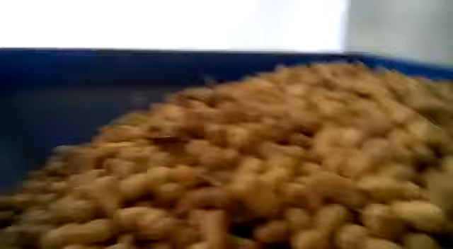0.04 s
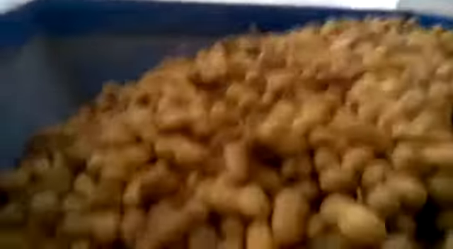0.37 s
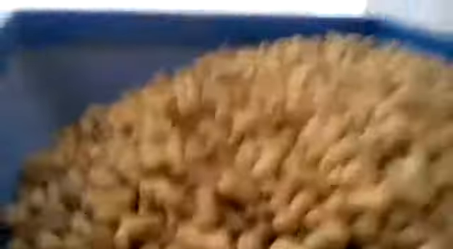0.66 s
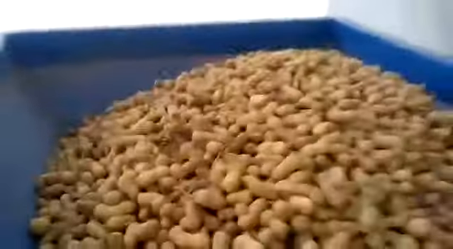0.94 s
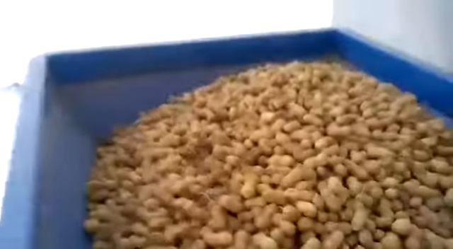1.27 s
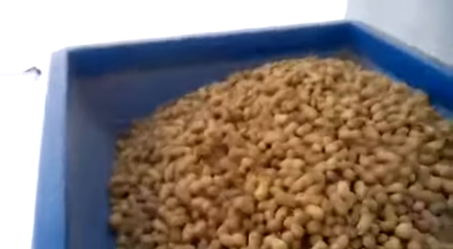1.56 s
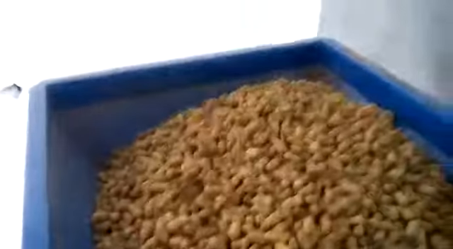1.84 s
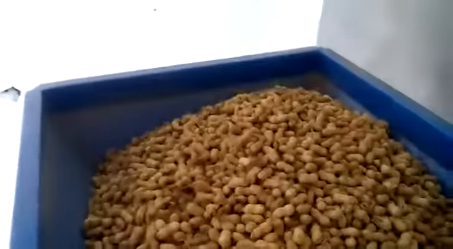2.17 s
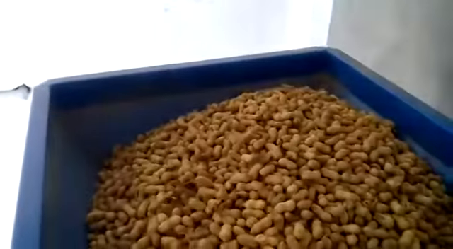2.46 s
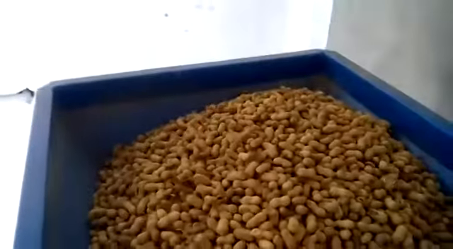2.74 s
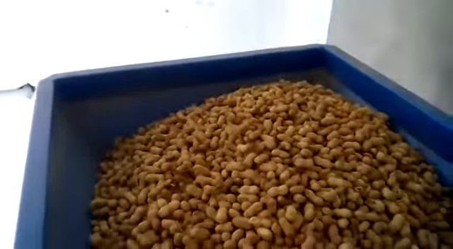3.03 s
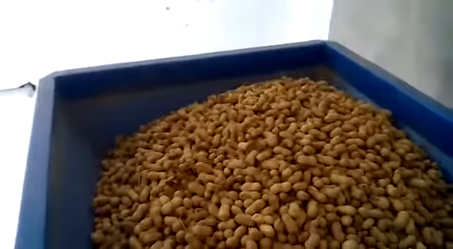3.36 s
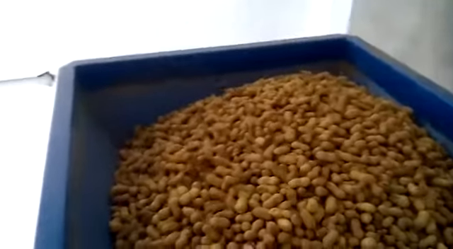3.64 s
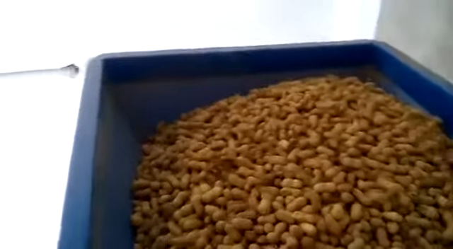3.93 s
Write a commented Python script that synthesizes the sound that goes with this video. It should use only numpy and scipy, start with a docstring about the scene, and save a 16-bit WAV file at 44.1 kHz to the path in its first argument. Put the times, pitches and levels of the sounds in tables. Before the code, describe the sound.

A peanut sheller runs steadily, dry pods rattling and cracking over a low rumble.

```python
"""Peanut sheller in a workshop

A sheller runs under a full hopper in a small, hard-walled room. Dry pods rattle in the drum and surge
over a ringing steel sieve about four times a second; now and then one cracks sharply. Underneath, the
drive hums, pods make the sheet-metal casing rumble and a few dull thuds rise. It all fades in quickly."""
import sys
import numpy as np
from scipy import signal
from scipy.fft import rfft, irfft
from scipy.io import wavfile
from scipy.ndimage import uniform_filter1d

SR = 44100
rng = np.random.default_rng(int(sys.argv[2]) if len(sys.argv) > 2 else 0)


def log_audio(samples):
    """Write samples as a 16-bit WAV file to the path given in sys.argv[1]."""
    # one column per channel
    frames = np.atleast_2d(samples).T
    # limit to full scale, then quantise
    limited = np.clip(frames, -1, 1)
    pcm = np.round(limited * 32767).astype(np.int16)
    wavfile.write(sys.argv[1], SR, pcm)


N = 176400

# rumble and drone as the load on the drum changes: t/s, casing level/dB, panel level/dB
DRUM_LOAD = [(.15, -14, 4.5), (.42, -0.5, 1.5), (0.602, -5, 4.5), (.7, -3.5, 7.5), (.88, 0.5, 3),
             (1.4, -2, 4), (1.75, -2, 2.5), (2.15, -1.5, 0), (2.45, -3, -4), (2.75, -3.5, 1),
             (3.22, -5, 0.5), (3.42, 2.5, 0.5), (3.66, -2, 0), (4, 1, -3)]

HUM_DB, PANEL_DB, CASING_DB, TUMBLE_DB = -46, -39.5, -37.5, -32
WALL_DB, CLINK_DB, TICK_DB, CRACK_DB = -44.5, -38.5, -47.5, -24.5
PING_DB, RATTLE_DB, SURGE_DB, RING_DB = -28.5, -22.5, -22, -21.5
KNOCKS_PER_S, TUMBLE_PER_S, RATTLE_PER_S = 300, 1400, 3500


def undb(db):
    """Decibels to gain."""
    return 10 ** (np.asarray(db) / 20)


def unit(x):
    """Scale to rms 1."""
    return x / np.sqrt(np.mean(x ** 2))


def drift(rate_hz):
    """Smooth random drift with a spread near 1."""
    hold = int(SR / rate_hz)
    steps = np.repeat(rng.standard_normal(N // hold + 1), hold)
    return 1.7 * uniform_filter1d(uniform_filter1d(steps, hold), hold)[:N]


def impacts(per_s, spread_db):
    """Randomly timed blows of uneven size, rms 1."""
    hit = rng.random(N) < per_s / SR
    size = undb(spread_db * np.clip(rng.standard_normal(N), -2, 2))
    return unit(hit * size * np.sign(rng.standard_normal(N)))


def colour(x, points):
    """Give each blow a causal ring with the spectrum of (f/Hz, level/dB) points, rms 1."""
    hz, db = np.array(points).T
    size = 8192
    f = np.maximum(np.arange(size // 2 + 1) * SR / size, 1)
    cepstrum = irfft(np.log(undb(np.interp(np.log(f), np.log(hz), db))))
    cepstrum[1:size // 2] *= 2  # fold to minimum phase
    cepstrum[size // 2 + 1:] = 0
    return unit(signal.fftconvolve(x, irfft(np.exp(rfft(cepstrum))))[:N])


def ring(x, hz, width_hz):
    """One resonance, rms 1: two band-passes in series, each twice width_hz wide."""
    b, a = signal.iirpeak(hz, hz / (2 * width_hz), fs=SR)
    return unit(signal.lfilter(b, a, signal.lfilter(b, a, x)))


def room(x, t60_s=0.31, wet_db=0.5):
    """Direct sound plus the short tail of the workshop."""
    t = np.arange(SR // 2) / SR
    tail = rng.standard_normal(len(t)) * np.exp(-np.log(1000) * t / t60_s) * (t > .004)
    wet = signal.fftconvolve(x, tail / np.sqrt(np.sum(tail ** 2)))[:N]
    return (x + undb(wet_db) * wet) / np.sqrt(1 + undb(2 * wet_db))


def scattered(per_s, spread_db, places=6):
    """Blows from several places, each with its own reflections."""
    return unit(sum(room(impacts(per_s / places, spread_db)) for _ in range(places)))


def pings(per_s, centre_hz, pitch_spread, decay_s):
    """Single pods strike steel parts, each ringing briefly at its own pitch."""
    out, age = np.zeros(N + SR), np.arange(SR // 8) / SR
    for when, pitch, size in rng.random((int(per_s * N / SR), 3)):
        hz = centre_hz * 2 ** (pitch_spread * np.arcsin(2 * pitch - 1))
        strength = np.sqrt(-np.log(1 - size))
        start = int(when * N)
        out[start:start + len(age)] += strength * np.sin(2 * np.pi * hz * age) * np.exp(-age / decay_s)
    return unit(out[:N])


def drive_hum(panels_db, hz=85.2):
    """The drive hums on one wavering tone that swells a little with the panels."""
    cycles = np.cumsum(hz * (1 + 0.021 * drift(7.93))) / SR
    tone = unit(undb(1.8 * drift(18)) * np.sin(2 * np.pi * cycles))
    return undb(HUM_DB + 0.33 * panels_db) * tone


def drum_wall():
    """Pods clink against the drum's bars and set its wall ringing on and off."""
    # wall resonances: f/Hz, width/Hz, level/dB
    wall_modes = [(618, 36, 1.5), (901, 38, 3.5), (1157, 47, 1)]
    ringing = sum(undb(db + 2.4 * drift(8)) * ring(impacts(KNOCKS_PER_S, spread_db=1.5), hz, width)
                  for hz, width, db in wall_modes)
    clinks = pings(per_s=130, centre_hz=1450, pitch_spread=1.0, decay_s=.022)
    return undb(WALL_DB) * unit(ringing) + undb(CLINK_DB) * clinks


def casing_rumble(casing_db, panels_db, flutter_hz=6.6, flutter_db=0.8):
    """Pods knock on the casing and its panels; the rumble and drone flutter slightly."""
    # colour of a knock on the casing: f/Hz, level/dB
    knock_colour = [(15, -21), (42, -16), (68, -23.5), (100, -1), (125, -0.5), (150, -12.5), (200, -3),
                    (290, 0.5), (380, -4), (450, -13), (900, -33)]
    # panel resonances: f/Hz, width/Hz, level/dB
    panel_modes = [(108.6, 8.6, -4), (127, 2.8, -4), (176.2, 17, 5), (226.2, 4.7, 0.5), (255.7, 8.2, 4),
                   (377.3, 3.3, -4.5)]
    cycles = np.cumsum(flutter_hz * (1 + 0.059 * drift(4.1))) / SR
    flutter = undb(-flutter_db * np.sin(2 * np.pi * cycles))
    knocks = colour(scattered(2 * KNOCKS_PER_S, spread_db=7.0), knock_colour)
    drone = unit(sum(undb(db) * ring(impacts(KNOCKS_PER_S, spread_db=2.5), hz, width)
                     for hz, width, db in panel_modes))
    return flutter * (undb(CASING_DB + casing_db) * knocks + undb(PANEL_DB + panels_db) * drone)


def low_thuds(t):
    """A few brief, dull low thuds swell out of the rumble."""
    # dull thuds: crest t/s, length/s, f/Hz, level/dB
    thuds = [(.69, 0.053, 190, -33), (3.4, 0.085, 289, -28.5), (3.475, 0.057, 130, -29.5),
             (3.578, 0.054, 340, -31.5)]
    out = np.zeros(N)
    for at, length, hz, db in thuds:
        body = ring(impacts(TUMBLE_PER_S, spread_db=3.5), hz, width_hz=0.255 * hz)
        out += undb(db) * np.exp(-2 * ((t - at) / length) ** 2) * body
    return out


def tumbling_pods(casing_db):
    """Pods tumble in the drum: a midrange clatter, harder under load."""
    # colour of the clatter: f/Hz, level/dB
    tumble_colour = [(150, -26), (350, 0), (600, -2), (800, -5), (905, -1), (1050, -5), (1600, -2.5),
                     (2500, -1), (5000, -32.5)]
    gain = undb(TUMBLE_DB + 0.4 * casing_db + 1.55 * drift(12))
    return gain * colour(scattered(TUMBLE_PER_S, spread_db=3.5), tumble_colour)


def cracking_pods(t, crack_decay_s=.017, tick_decay_s=.005):
    """A splitting pod is a quick run of bright fractures; small lone ticks fall in between."""
    # pods cracking near the top: t/s, level/dB
    cracks = [(.628, 1), (1.335, -1), (1.642, -12), (1.844, -9), (2.988, -10), (3.119, 3.5), (3.897, -1)]
    # colour of a fracture: f/Hz, level/dB
    snap_colour = [(1500, -14), (4000, -2), (6500, 0), (9000, -8), (12000, -10), (15000, -14)]
    bursts = sum(undb(db) * (t >= at) * np.exp(-np.maximum(t - at, 0) / crack_decay_s)
                 for at, db in cracks)
    triggers = abs(impacts(per_s=40, spread_db=3))
    ticks = unit(signal.lfilter([1], [1, -np.exp(-1 / (tick_decay_s * SR))], triggers))
    fractures = colour(impacts(per_s=9000, spread_db=3), snap_colour)
    return (undb(CRACK_DB) * bursts + undb(TICK_DB) * ticks) * fractures


def sieve(t):
    """Shells rattle all the time; each surge throws more of them on the steel, which rings."""
    # surges over the sieve: crest t/s, length/s, level/dB, ring f/Hz, relative ring level/dB
    surges = [(0.37, .1, -3, 5050, -1.5), (0.459, .09, -4.5, 5500, -0.5), (0.606, 0.097, -1, 4080, -0.5),
              (.7, 0.12, -5.5, 4920, -1), (0.802, 0.17, -3, 2890, -4.5), (0.987, 0.086, -8.5, 6060, 6),
              (1.006, 0.18, -1, 4100, -7), (1.1, 0.14, -4.5, 5540, 2.5), (1.34, 0.2, -1.5, 5280, -8),
              (1.536, .05, -2, 5500, -12), (1.69, 0.21, -4, 6330, -1), (1.858, 0.19, -1.5, 5100, -3.5),
              (2.087, 0.084, -2, 5280, -3), (2.32, 0.21, -1.5, 4940, -10), (2.588, 0.16, -1.5, 5720, -6.5),
              (2.82, 0.11, -1, 5230, -6), (3.107, 0.15, -1.5, 5580, -1), (3.356, 0.13, -1, 4900, -21),
              (3.466, 0.17, -4, 5400, -7), (3.635, 0.14, -1.5, 4950, -7), (3.884, 0.16, 0.5, 4940, -9),
              (4.0, 0.035, -3, 5100, -12)]
    # colour of dry shells: f/Hz, level/dB
    shell_colour = [(700, -23), (1500, -17), (2200, -10.5), (2850, -5.5), (3300, -6), (4100, -3), (5150, 0),
                    (5900, -2.5), (6500, -4), (7200, -10.5), (8300, -20), (10000, -27), (15000, -40)]
    flow, ringing = np.zeros(N), np.zeros(N)
    for at, length, db, hz, ring_db in surges:
        swell = np.exp(-2 * ((t - at) / length) ** 2)
        flow += (swell * undb(db)) ** 2  # surges add in power
        steel = ring(impacts(RATTLE_PER_S, spread_db=13), hz, width_hz=140)
        ringing += swell * undb(db + ring_db) * steel
    steady = scattered(RATTLE_PER_S, spread_db=4.0) * undb(RATTLE_DB + .5 * drift(25.5))
    blows = steady + undb(SURGE_DB) * np.sqrt(flow) * scattered(RATTLE_PER_S, spread_db=1.5)
    rattle = np.std(blows) * colour(blows, shell_colour)
    strikes = pings(per_s=130, centre_hz=5100, pitch_spread=.27, decay_s=.013)
    return rattle + undb(RING_DB) * ringing + undb(PING_DB) * np.sqrt(0.44 + flow) * strikes


def scene():
    """The machine heard from just above its hopper."""
    t = np.arange(N) / SR
    times, casing_db, panels_db = np.array(DRUM_LOAD).T
    casing_db, panels_db = np.interp(t, times, casing_db), np.interp(t, times, panels_db)
    shells = sieve(t) + cracking_pods(t)
    bed = casing_rumble(casing_db, panels_db) + tumbling_pods(casing_db) + drive_hum(panels_db)
    return (shells + bed + low_thuds(t) + drum_wall())[None]


def record(dry, start_s=.15, fade_s=0.19, fade_from_db=-13.5, top_hz=14950):
    """A moment of silence, then a short fade-in; the highest treble is cut steeply."""
    since = np.arange(N) / SR - start_s
    onset = np.clip(since / 0.016, 0, 1)
    fade = onset * undb(fade_from_db * np.clip(1 - since / fade_s, 0, 1))
    return signal.sosfilt(signal.ellip(14, .2, 90, top_hz, fs=SR, output="sos"), dry * fade)


dry = scene()
out = record(dry)
log_audio(out)
```